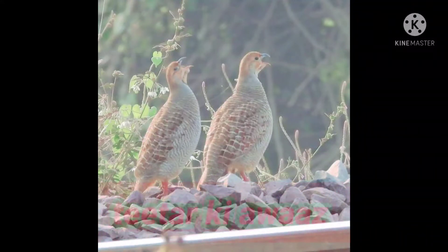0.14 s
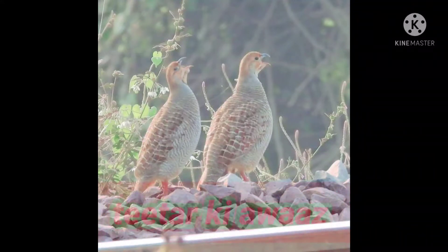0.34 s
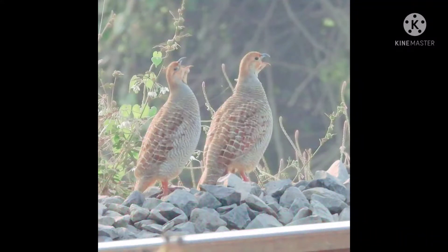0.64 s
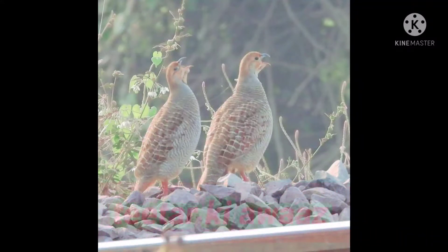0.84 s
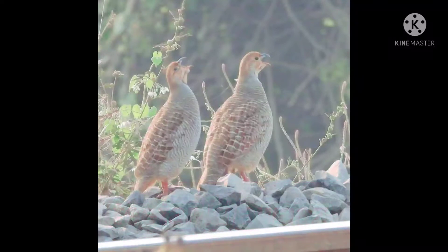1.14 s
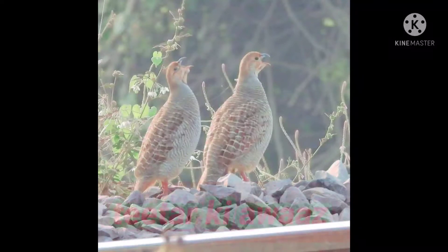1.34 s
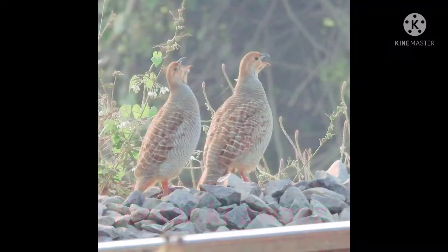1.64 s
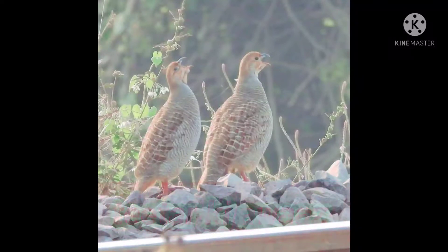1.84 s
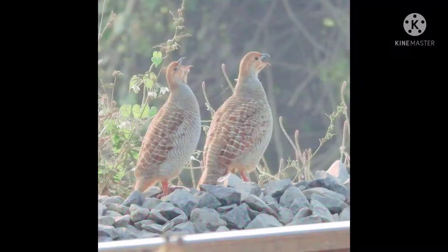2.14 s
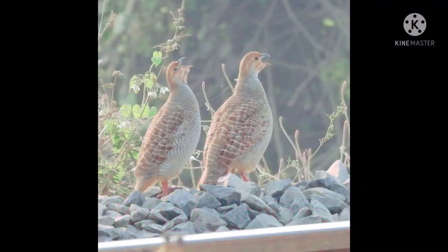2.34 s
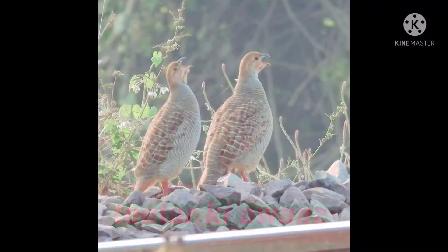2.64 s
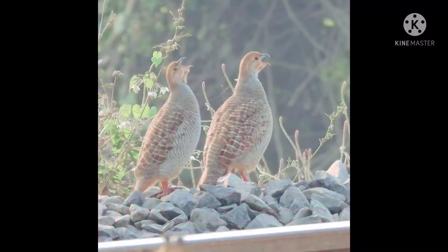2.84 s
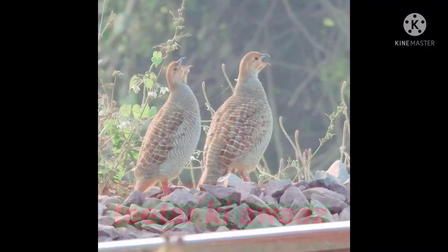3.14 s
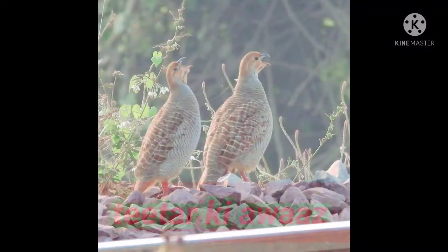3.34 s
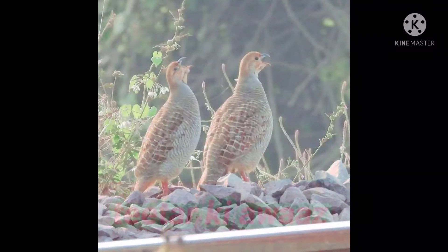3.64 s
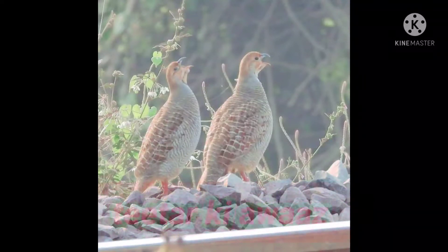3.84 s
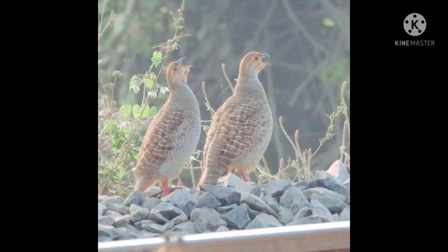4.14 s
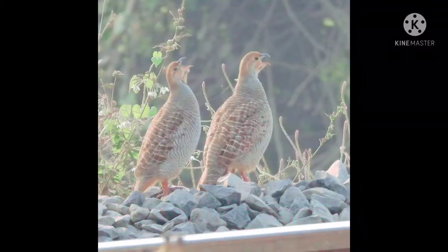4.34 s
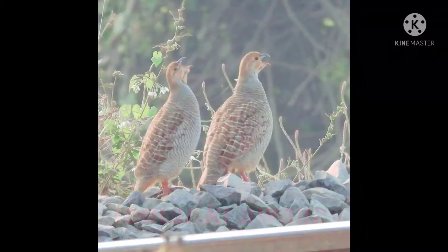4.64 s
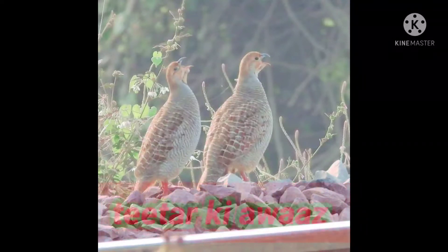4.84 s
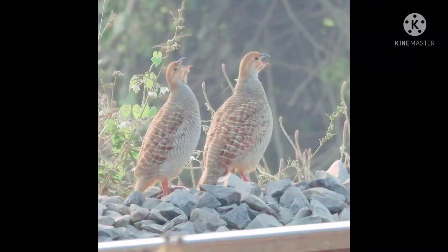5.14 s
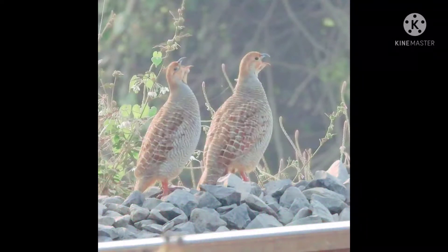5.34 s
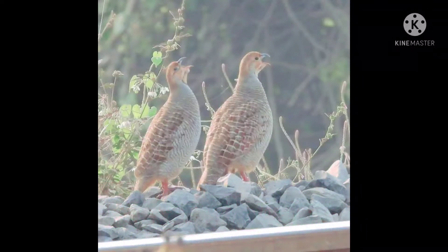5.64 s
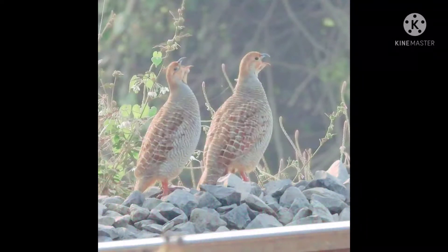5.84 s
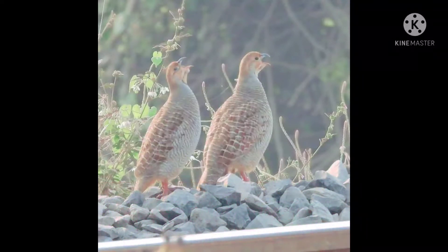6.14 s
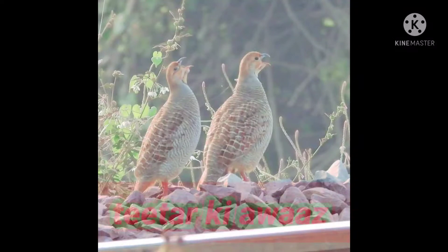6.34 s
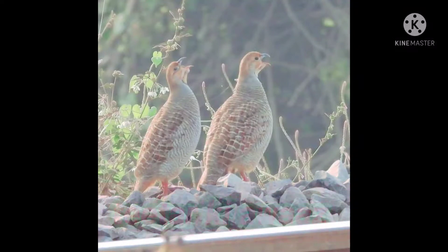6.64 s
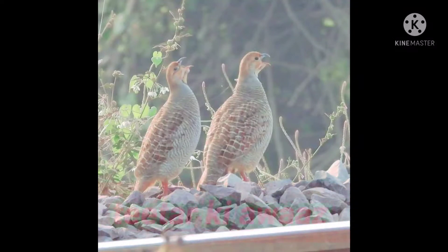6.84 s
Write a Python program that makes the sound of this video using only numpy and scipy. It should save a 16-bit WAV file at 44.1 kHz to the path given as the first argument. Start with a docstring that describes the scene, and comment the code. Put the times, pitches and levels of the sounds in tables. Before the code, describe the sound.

Outdoors among grass and bushes, a fast, high insect trill and cricket chirps run over a low hum and soft, far-off thuds. Close to the microphone, two game birds give a cluck, two loud bursts of shrill, rasping whistles, and a short run of falling clucks. The insects then carry on, with thin chirps from distant small birds, a faint cooing dove and two more clucks.

```python
"""Insects trill and chirp in the grass, over a low hum, distant dull thuds and a faint hiss.
Then two grey francolins call close by: two shrill phrases that break between whistle and rasp, and
falling clucks. In rasps and clucks the membranes of the syrinx slap periodically, and throat and beak
filter the sound. The insects stridulate, exciting their wings' resonances.
Small birds call far off, and bushes give a thin echo."""
import sys
import numpy as np
from scipy import signal
from scipy.fft import rfft, irfft, next_fast_len
from scipy.io import wavfile
from scipy.ndimage import map_coordinates

SR = 44100
rng = np.random.default_rng(int(sys.argv[2]) if len(sys.argv) > 2 else 0)


def master(y):
    """Save y as 16-bit WAV."""
    cut = np.clip(np.atleast_2d(y).T, -1, 1)
    pcm = np.round(cut * 32767)  # scale
    wavfile.write(sys.argv[1], SR, pcm.astype(np.int16))


N = 308700

# Francolin notes, four to a phrase: yelp, high whistle, lower whistle, fall. Each row: start and length
# in seconds, pitch and sag in Hz, level in dB, overtone gain in dB, level of the rasp under the tone
# in dB, length of the closing tear in seconds, level of the tear in dB.
NOTES = [(1.929, 0.032, 2680, 190, -37, 23.5, -34.5, .054, -30.5),
         (2, 0.06, 2855, 117, -16, 1, -45.5, 0.061, -28.5),
         (2.109, 0.029, 2360, 20, -17.5, 8.5, -26, 0.022, -25),
         (2.151, 0.049, 2260, 576, -16, 8.5, -35.5, 0.0051, -34),
         (2.569, 0.036, 2807, 240, -32, 23.5, -33, 0.031, -27),
         (2.629, 0.061, 2860, 12, -11.5, -2.5, -44.5, .029, -24),
         (2.721, 0.035, 2440, 8.4, -12.5, 2, -22, 0.014, -21),
         (2.758, .068, 2440, 636, -14, 3, -32, 0.0038, -35.5)]


def amp(db):
    """Amplitude ratio of a level in decibels."""
    return 10 ** (np.asarray(db) / 20)


def unit(x):
    """Normalisation to an rms of 1."""
    return x / np.sqrt(np.mean(x ** 2) + 1e-20)


def along(points, hz):
    """Interpolation of (Hz, value) points on a logarithmic frequency axis."""
    f, v = np.transpose(points)
    return np.interp(np.log(hz + 1), np.log(f + 1), v)


def clock(length):
    """Sample times in seconds."""
    return np.arange(int(length * SR)) / SR


def wobble(rate, n):
    """Smooth random modulation with rate knots a second."""
    return map_coordinates(rng.standard_normal(4096), [np.arange(n) * rate / SR], mode="wrap")


def coloured(x, spectrum):
    """Linear filtering by a curve of (Hz, dB) points, normalised to an rms of 1."""
    m = next_fast_len(len(x) + 2048)
    gain = amp(along(spectrum, np.fft.rfftfreq(m, 1 / SR)))
    return unit(irfft(rfft(x, m) * gain, m)[:len(x)])


def add(track, s, x):
    """Superposition of x on the track at s seconds."""
    i = round(s * SR)
    part = x[max(-i, 0):max(len(track) - i, 0)]
    track[max(i, 0):max(i, 0) + len(part)] += part


def swell(t, length, edge):
    """An envelope with quarter-sine ends."""
    return np.sin(np.pi / 2 * np.clip(np.minimum(t, length - t) / edge, 0, 1))


def unsteady(hz, jitter, jitter_rate):
    """Phase as the integral of a randomly wavering frequency."""
    return 2 * np.pi * np.cumsum(hz * (1 + jitter * wobble(jitter_rate, len(hz)))) / SR


def glide(t, length, pitches, jitter, jitter_rate):
    """Phase of an unsteady tone on a parabola through three pitches."""
    return unsteady(np.polyval(np.polyfit([0, .5, 1], pitches, 2), t / length), jitter, jitter_rate)


def outdoors(x, early_db, tail_db):
    """Reflection and scattering: ground and stones return early echoes, bushes a thin tail."""
    # Decay in the bushes. Each row: frequency in Hz, time to fall 60 dB in seconds.
    decay_times = [(500, 0.17), (2500, 0.65), (6000, 0.32), (12000, 0.23)]
    hz, t, noise = signal.stft(rng.standard_normal(SR // 2), SR, nperseg=256)
    tail = signal.istft(noise * amp(-60 * t / along(decay_times, hz)[:, None]), SR, nperseg=256)[1]
    response = amp(tail_db) * tail / np.linalg.norm(tail)
    for delay, db in [(.011, 0.5), (.019, -2), (.031, -6.5), (.066, -14)]:
        response[round(delay * SR)] += amp(early_db + db)
    return x + signal.fftconvolve(x, response)[:N]


def background(hum_gain_db=4, air_db=-53.5, chorus_db=-60):
    """Spectrally shaped noise: a low hum, moving air and a haze of far insects."""
    # The three spectra. Each row: frequency in Hz, gain in dB.
    hum_spectrum = [(25, -39), (42, -37), (58, -13), (72, 2.5), (100, 5), (135, -3.5), (180, -3),
                    (230, -16), (400, -25.5), (900, -55)]
    air_spectrum = [(100, -13.5), (250, 5), (400, -0.5), (600, 1), (900, -3), (1400, -3.5), (2200, -8),
                    (3200, -12), (4200, -23.5), (5500, -25), (10500, -26.5), (13000, -22.5), (15500, -17.5)]
    chorus_spectrum = [(4500, -43.5), (5600, -20.5), (6300, 12), (7400, 15), (8200, 17.5), (8700, -2),
                       (9300, -4), (9900, -46), (11000, -56)]
    # The hum's drift. Each row: time in seconds, relative level in dB.
    hum_drift = [(0.0, -52), (1.07, -54), (1.64, -52.5), (1.79, -48.5), (2.05, -45), (2.36, -48),
                 (3.74, -53), (4.23, -48.5), (4.68, -53.5), (5.38, -49.5), (6.0, -54), (6.32, -47.5),
                 (6.84, -52), (7.0, -49)]
    t = np.arange(N) / SR
    hum_db = np.interp(t, *np.transpose(hum_drift)) + hum_gain_db
    hum = amp(hum_db) * coloured(rng.standard_normal(N), hum_spectrum)
    hiss_db = np.interp(t, [0, N / SR], [air_db - .7, air_db + 0.64])
    hiss = amp(hiss_db) * coloured(rng.standard_normal(N), air_spectrum)
    chorus = amp(chorus_db + 2.8 * wobble(13, N)) * coloured(rng.standard_normal(N), chorus_spectrum)
    return hum + hiss + chorus


def thuds(start_s=-.012, period_s=.6055, length=0.17):
    """Damped low oscillations: dull far-off beats that sink in pitch."""
    # Each entry: level of one beat in dB.
    beat_levels = [-33, -31.5, -38.5, -40, -47, -34, -53.5, -45.5, -37.5, -36.5, -41, -54]
    out, t = np.zeros(N), clock(length)
    shape = amp(np.interp(t, [0, .045, .09, .15], [-17, -2, -10.5, -23])) * swell(t, length, 0.02)
    for beat, db in enumerate(beat_levels):
        tone = unit(np.sin(glide(t, length, [104, 78, 58], 0.071, 56)))
        add(out, start_s + beat * period_s, amp(db) * shape * tone)
    return out


def ticks(t60=0.12):
    """Exponentially decaying noise bursts, heard as small dry ticks."""
    # Each row: start in seconds, level in dB.
    bursts = [(0.622, -46), (3.582, -64)]
    # Each row: frequency in Hz, gain in dB.
    spectrum = [(300, -3), (700, -4), (1100, 12), (1700, 3), (3000, -3), (6000, -14), (12000, -26),
                (15500, -22.5)]
    out, t = np.zeros(N), clock(0.071)
    for s, db in bursts:
        add(out, s, amp(db - 60 * t / t60) * coloured(rng.standard_normal(len(t)), spectrum))
    return out


def small_birds(low_hz=2080, high_hz=3680, rise_s=0.039, fall_s=0.021, arch=0.038, wander=0.095):
    """Frequency sweeps of a pure tone: thin slurs, whip calls and very high pips."""
    # Each row: start and length in seconds, first and last pitch in Hz, level in dB.
    slurs = [(.056, 0.052, 3850, 2190, -52), (.924, 0.045, 1820, 1360, -47.5), (.95, .16, 3000, 2350, -59),
             (1.261, 0.14, 3200, 2450, -62), (1.42, 0.29, 2830, 2760, -63.5),
             (1.427, 0.3, 3260, 3150, -66.5), (4.19, .04, 2080, 2300, -59.5),
             (4.64, 0.29, 3200, 3140, -66.5), (5.12, .046, 2320, 1940, -57),
             (5.432, 0.033, 2380, 1840, -51), (6.295, .1, 4960, 2550, -65.5),
             (6.566, .065, 2250, 3380, -62), (6.743, 0.096, 3400, 2580, -63)]
    # Whips rise softly from low_hz to high_hz, then fall fast.
    # Each row: time of the turn in seconds, level of the fall in dB, rise relative to it in dB.
    whips = [(4.061, -50.5, -10), (4.24, -47.5, -18), (4.449, -52.5, -6)]
    # Each row: start in seconds, level in dB.
    pips = [(.01, -34.5), (0.388, -38.5), (.672, -41)]
    rises = [(s - rise_s, rise_s, low_hz, high_hz, db + rise_db) for s, db, rise_db in whips]
    falls = [(s, fall_s, high_hz, low_hz, db) for s, db, _ in whips]
    pip_sweeps = [(s, 0.0185, 9130, 8940, db) for s, db in pips]
    out = np.zeros(N)
    for s, length, start_hz, end_hz, db in list(slurs) + rises + falls + pip_sweeps:
        t = clock(length)
        bend = arch * np.sin(np.pi * t / length) + wander * wobble(45, len(t))
        hz = np.geomspace(start_hz, end_hz, len(t)) + abs(end_hz - start_hz) * bend
        tone = np.sin(unsteady(hz, 0.013, 352))
        flutter = amp(2.3 * wobble(164, len(t)))
        add(out, s, amp(db) * swell(t, length, 0.0042) * unit(tone * flutter))
    return out


def twitters(hz=4500, run_s=.27, period_s=.04):
    """Trains of tone bursts: a far bird's twittering swells and fades in each run."""
    # Each row: start in seconds, level at mid-run in dB.
    runs = [(.75, -65.5), (1.661, -66), (4.017, -67), (5.44, -69), (6.469, -65.5)]
    out, t = np.zeros(N), clock(0.041)
    for start, run_db in runs:
        for s in np.arange(0, run_s, period_s):
            db = run_db + rng.normal(0, 1.9) - 5 * abs(2 * s / run_s - 1)
            onset = start + s + rng.normal(0, 0.0079)
            tone = np.sin(glide(t, 0.03, hz * np.array([1.02, 1, .97]), 0.017, 400))
            add(out, onset, amp(db) * swell(t, 0.052, 0.0226) * tone)
    return out


def dove(db=-55, length=0.1):
    """Nearly pure tones with slow onsets: a far dove's coos."""
    # Each row: start in seconds, pitch in Hz.
    coos = [(4.41, 621), (4.477, 592), (5.28, 679), (5.748, 587), (5.87, 666), (6.6, 581), (6.761, 584)]
    out, t = np.zeros(N), clock(length)
    for s, hz in coos:
        add(out, s, amp(db) * swell(t, length, 0.064) * np.sin(glide(t, length, [hz] * 3, 0.024, 59)))
    return out


def buzzes(db=-55, hz=6380, length=0.063, period_s=.381, pulse_hz=170):
    """Rapid amplitude modulation turns an insect's tone into short soft buzzes."""
    out, t = np.zeros(N), clock(length)
    teeth = np.abs(np.sin(np.pi * pulse_hz * t))
    for s in np.arange(.1, N / SR, period_s):
        tone = np.sin(glide(t, length, [hz] * 3, 0.074, 2200))
        add(out, s, amp(db) * swell(t, length, .025) * teeth * tone)
    return out


def crickets(near_db=-52, far_db=-60, near_hz=9130, far_hz=9440, slide_hz=130, pulse_s=.048):
    """Stridulation: two crickets chirp in groups of soft pulses, each sliding down a little."""
    # The near cricket. Each row: start of a bout in seconds, number of pulses in each of its chirps.
    bouts = [(.19, (2, 2, 2, 3, 3, 2, 3, 3, 3, 2, 2, 2, 2, 3, 4, 3, 4)),
             (4.674, (2, 2, 3, 2, 2, 2, 2, 3, 2, 2))]
    out, near = np.zeros(N), []
    for s, counts in bouts:
        for count in counts:
            near.append((s, count * pulse_s))
            s += count * pulse_s + .1288  # a pause follows each chirp
    far = [(s + rng.normal(0, 0.042), .19) for s in np.arange(.1, N / SR, .26)]
    for chirps, hz, db in ((near, near_hz, near_db), (far, far_hz, far_db)):
        for s, length in chirps:
            t = clock(length)
            stroke = t / pulse_s % 1
            tone = np.sin(unsteady(hz + slide_hz * (1 - 2 * stroke), 0.0042, 870))
            add(out, s, amp(db) * np.sin(np.pi * stroke) ** 2 * swell(t, length, .008) * tone)
    return out


def trill(first_db=-39, last_db=-37, period_s=.06498, pair_gap_s=.0208, length=.0135):
    """Swept resonance: paired wing strokes slide down in pitch, peaking at the wing's resonances."""
    # Each row: time in seconds, the insect's lag behind a steady beat in seconds.
    lags = [(.42, -.001), (.47, .017), (1.39, .011), (1.84, .021), (2.23, .012), (3, .011), (4.5, .002),
            (5.28, .009), (7, 0)]
    out, t = np.zeros(N), clock(length)
    beats = np.arange(.021, N / SR, period_s)
    stroke_db = [-41.5, -4.5, -15.5, 2, -11.5, -14.5, -18.5]
    stroke = amp(np.interp(t / length, [0, .14, .27, .39, .55, .85, 1], stroke_db))
    for s in beats + np.interp(beats, *np.transpose(lags)):
        db = np.interp(s, [0, N / SR], [first_db, last_db])
        for delay in (0, pair_gap_s):
            phase = glide(t, length, [8550, 7330, 5900], 0.018, 2100)
            add(out, s + delay, amp(db + rng.normal(0, 1)) * stroke * np.sin(phase))
    return out


def rattle(phase, noise_db, flutter_db, formant, count=30):
    """Periodic slaps of the syrinx membranes give fluttering harmonics and puffs of turbulence."""
    n = len(phase)
    top_hz = np.max(np.diff(phase)) * SR / (2 * np.pi)
    harmonics = np.zeros(n)
    for k in range(1, count + 1):
        gain = formant(k) * amp(flutter_db * np.tanh(wobble(170, n)))
        harmonics += gain * np.cos(k * phase + rng.normal(0, 1.5)) * (k * top_hz < SR / 2)
    puffs = (1 + np.cos(phase)) * rng.standard_normal(SR)[:n]
    return unit(harmonics), amp(noise_db) * puffs


def clucks(length=.075, peak_s=0.024, rise_db_per_s=850, fall_db_per_s=400, width_hz=420):
    """Source and filter: a hoarse note arches and drops in pitch while the beak's resonance sinks."""
    # Each row: start in seconds, level in dB, nominal pitch and beak resonance in Hz.
    calls = [(1.617, -33, 479, 1600), (2.31, -28, 607.3, 2000), (2.416, -39, 511, 1560),
             (2.93, -18.5, 646.4, 2140), (3.036, -24.5, 598, 1895), (3.138, -37, 516, 1550),
             (3.236, -46, 453, 1360), (5.2, -28.5, 485, 1770), (5.741, -50, 440, 1670)]
    # The throat's response. Each row: frequency in Hz, gain in dB.
    throat = [(400, 2), (700, -1), (1050, 3.5), (1300, 0), (1800, 4), (2600, 3), (3400, 3.5), (4300, -5),
              (7000, 2), (12000, -10), (16000, -35)]
    out, t = np.zeros(N), clock(length)
    below_peak_db = np.maximum(rise_db_per_s * (peak_s - t), fall_db_per_s * (t - peak_s))
    shape = amp(-below_peak_db) * swell(t, length, 0.0061)
    beak = lambda offset_hz: 1 / np.hypot(1, offset_hz / width_hz)
    grid_hz = np.geomspace(200, 16000, num=40)
    for s, db, pitch_hz, beak_hz in calls:
        phase = glide(t, length, pitch_hz * np.array([.88, .98, .66]), 0.039, 600)
        hz = np.gradient(phase) * SR / (2 * np.pi)
        centre_hz = beak_hz * np.interp(t / length, [0, .35, 1], [1.15, 1.03, .6])
        resonance = lambda k: beak(k * hz - centre_hz) ** 2.66
        voice, air = rattle(phase, noise_db=-7, flutter_db=2.5, formant=resonance)
        air = np.std(air) * coloured(air, [(f, 20 * np.log10(beak(f - beak_hz))) for f in grid_hz])
        note = coloured(voice + air, throat)
        treble_db = 0.14 * (pitch_hz - 604)  # the beak opens with pitch, so higher clucks are brighter
        add(out, s, amp(db) * shape * coloured(note, [(1950, 0), (2900, treble_db)]))
    return out


def rasps(order=6, jitter=0.0397, lead_s=0.0064, crossover_s=0.0086):
    """Subharmonic oscillation: the whistle tears as the syrinx slaps at a fraction of its pitch."""
    # The throat's response. Each row: frequency in Hz, gain in dB.
    throat = [(400, -24), (800, -25), (1080, -4.5), (1400, -13.5), (1800, -7.5), (2400, -3), (3500, -0.5),
              (4300, -11.5), (5200, -13.5), (6200, -15), (8200, -15), (9500, -22.5), (12000, -45),
              (15500, -28)]
    out = np.zeros(N)
    emphasis = lambda k: 2 if k % order == 0 else 1  # the whistle's own harmonics still stand out
    for s, tone_s, pitch_hz, _, _, overtone_db, under_db, tear_s, tear_db in NOTES:
        length = lead_s + tone_s + tear_s
        t = clock(length)
        gain = np.interp(t - lead_s, [tone_s - crossover_s, tone_s], amp([under_db, tear_db]))
        phase = glide(t, length, pitch_hz / order * np.array([1.01, 1.02, .94]), jitter, 220.1)
        voice, air = rattle(phase, noise_db=-5.5, flutter_db=12.5, formant=emphasis)
        treble_db = -0.5 + 0.43 * overtone_db  # pressed notes rasp brighter
        note = coloured(coloured(voice + air, throat), [(2500, 0), (7000, treble_db)])
        flutter = amp(0.51 * wobble(171, len(t)))
        add(out, s - lead_s, gain * flutter * swell(t, length, 0.0056) * note)
    return out


def whistles(break_hz=2280, fade_db_per_s=52, attack_s=0.019, release_s=.009):
    """A harmonic series: a whistle holds, then sags, fluttering and dulling as it falls low."""
    # Each row, from the second harmonic up: harmonic number, relative level in dB.
    overtones = [(2, -20), (3, -17), (4, -36), (5, -47)]
    out = np.zeros(N)
    for s, length, pitch_hz, sag_hz, db, overtone_db, *_ in NOTES:
        t = clock(length)
        scoop_hz = 14 * overtone_db * np.exp(-t / 0.00603)  # pressed, bright notes scoop up farther
        hz = pitch_hz - sag_hz * (t / length) ** 3.1 - scoop_hz
        lowness = np.clip((break_hz - hz) / 400, 0, 1)
        phase = unsteady(hz, 0.0045 + 0.054 * lowness, 704)
        upper_db = overtone_db - 22 * lowness
        upper = sum(amp(level + upper_db + 4 * wobble(218, len(t))) * np.sin(k * phase)
                    for k, level in overtones)
        shape = np.sin(np.pi / 2 * np.clip(np.minimum(t / attack_s, (length - t) / release_s), 0, 1))
        flutter_db = 10.5 * lowness * np.tanh(wobble(330, len(t)))
        gain = np.sqrt(2) * amp(db - fade_db_per_s * t + flutter_db)
        add(out, s, gain * shape * (np.sin(phase) + upper))
    return out


def scene():
    """Superposition of all sources in one channel, with echoes on the birds and the nearer insects."""
    francolins = outdoors(whistles() + rasps() + clucks(), early_db=-10, tail_db=-18.5)
    far_birds = outdoors(small_birds() + twitters() + dove(), early_db=-12.5, tail_db=-18.5)
    insects = outdoors(trill() + crickets() + buzzes(), early_db=-26, tail_db=-21.5)
    return (francolins + far_birds + insects + ticks() + thuds() + background())[None]


def record(dry):
    """An ideal low-pass filter limits the bandwidth."""
    top_hz = 15650
    m = next_fast_len(N + 8192)
    return irfft(rfft(dry, m) * (np.fft.rfftfreq(m, 1 / SR) < top_hz), m)[..., :N]


dry = scene()
out = record(dry)
master(out)
```